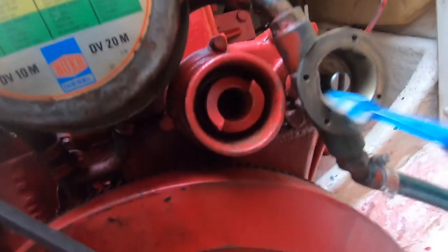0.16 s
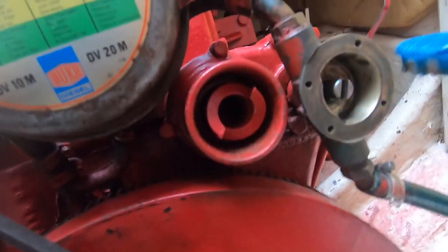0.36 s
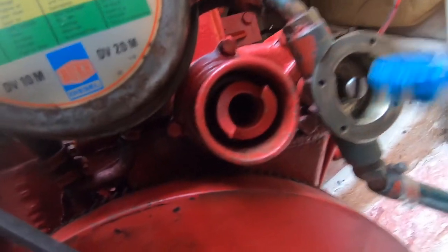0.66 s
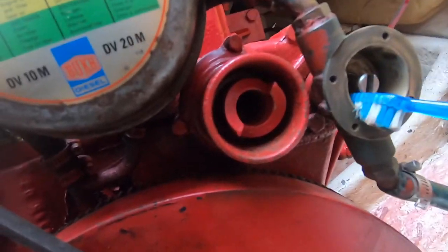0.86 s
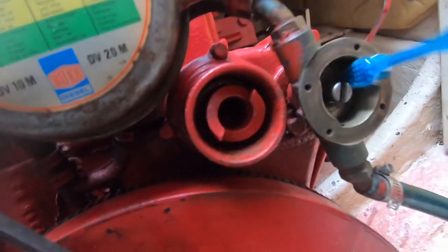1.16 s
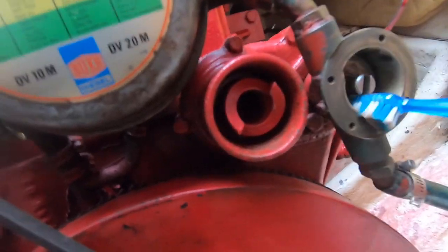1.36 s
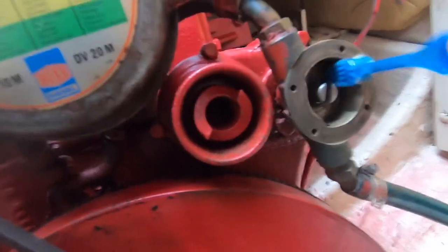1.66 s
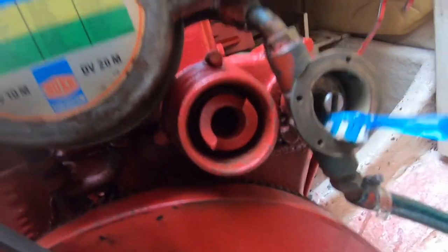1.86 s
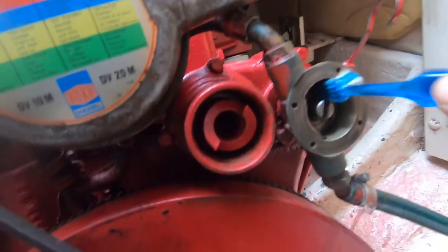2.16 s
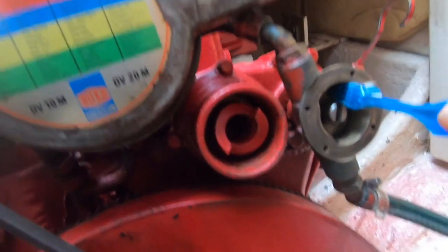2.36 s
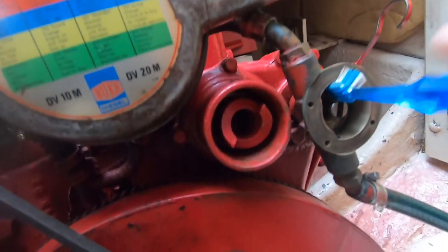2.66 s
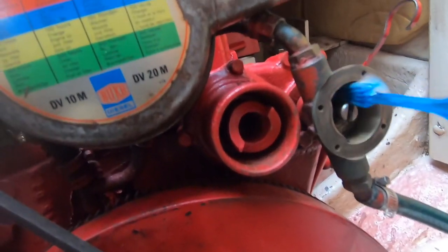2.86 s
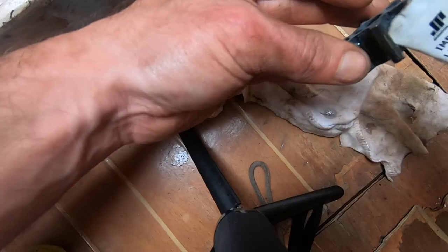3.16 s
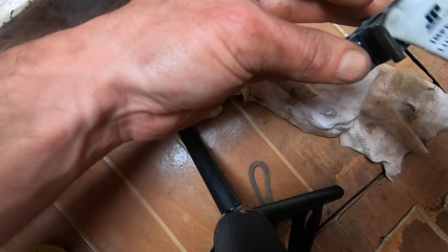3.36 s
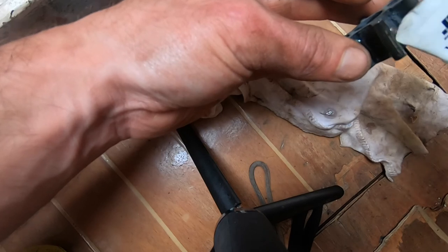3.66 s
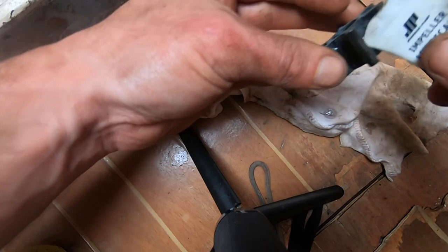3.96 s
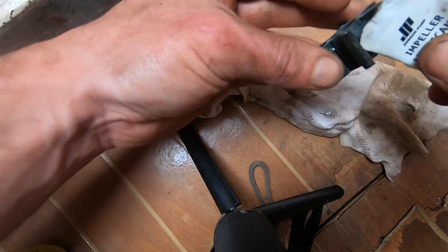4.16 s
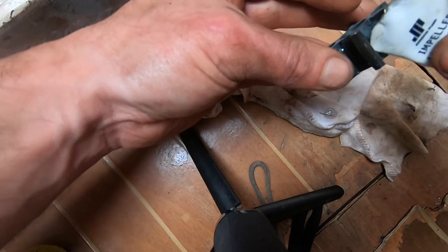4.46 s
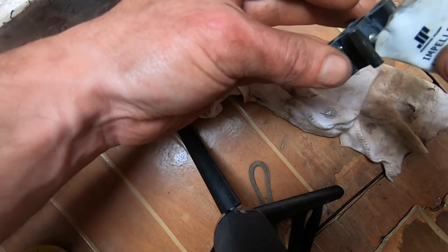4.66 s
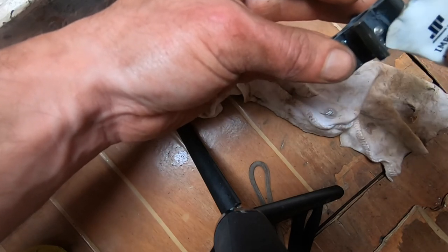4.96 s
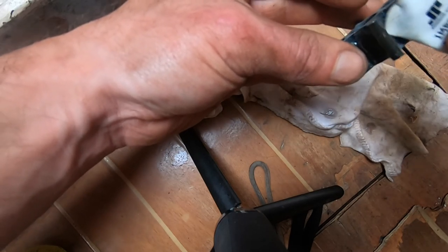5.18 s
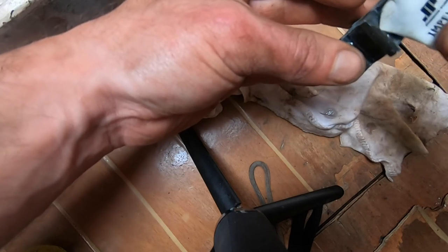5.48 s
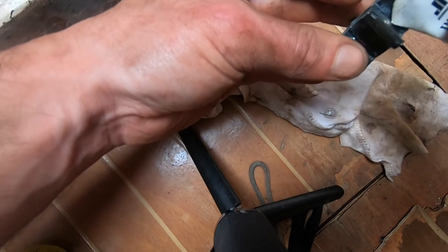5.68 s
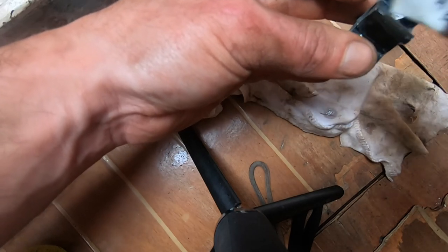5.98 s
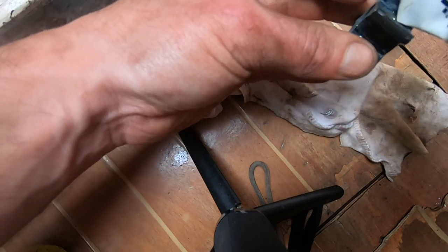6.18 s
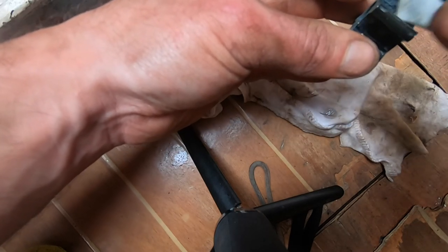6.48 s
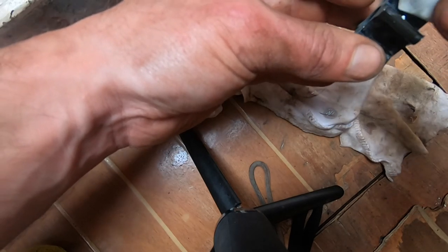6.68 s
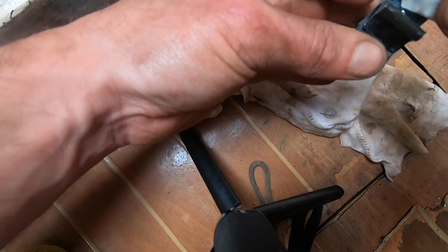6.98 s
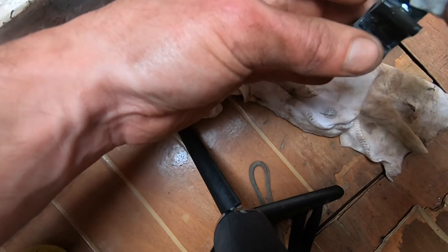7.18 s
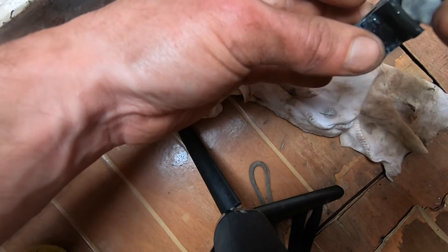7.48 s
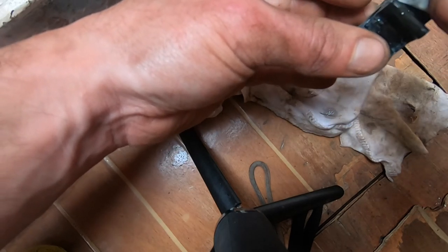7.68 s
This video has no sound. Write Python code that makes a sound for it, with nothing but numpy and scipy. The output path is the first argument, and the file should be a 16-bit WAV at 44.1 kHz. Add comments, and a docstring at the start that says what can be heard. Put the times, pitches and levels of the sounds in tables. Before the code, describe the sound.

Irregular bristle scratching and sharp knocks on hollow metal, one microphone thump, then quiet sticky rubbing of rubber with faint distant birds.

```python
"""A toothbrush scrubs and knocks inside a ringing metal pump housing in a boat's engine space.
Bristles slip in clumps, the head strikes the rim, and the hand-held camera takes one hard bump, then
creaks. At 3.1 s the scene cuts to a quiet cabin: fingers rub crackling grease over a rubber impeller,
with soft scuffs and a tap on the boards. Birds whistle far outside, over grip rumble and the hull's hush."""
import sys
import numpy as np
from scipy import signal
from scipy.fft import rfft, irfft, next_fast_len
from scipy.io import wavfile
from scipy.ndimage import uniform_filter1d, map_coordinates

SR = 44100
rng = np.random.default_rng(int(sys.argv[2]) if len(sys.argv) > 2 else 0)


def dump_mix(stems):
    """Bounce the given channels to the path in sys.argv[1] as a 16-bit WAV at rate SR."""
    frames = np.atleast_2d(stems).T  # one column per channel
    limited = np.clip(frames, -1, 1)  # hard clip at full scale
    pcm = np.round(limited * 32767).astype(np.int16)
    wavfile.write(sys.argv[1], SR, pcm)


N = 345303
CUT_S, RING_END_S = 3.1, 3.3  # the cabin begins; the engine space stops ringing
BEFORE_CUT = np.arange(N) < CUT_S * SR


def toothbrush():
    """Bristles slip in clumps over metal; slips and knocks ring the housing, its rim and the handle."""
    # brush strokes: t/s, length/s, level/dB, change over the stroke/dB, tip brightness/dB
    scrubs = [ (0.034, 0.071, -58.5, 20.5, -12), (0.141, 0.14, -37, -11, -12), (.31, 0.096, -78.5, 5, -21),
              (.405, 0.018, -55.5, -2.5, -32), (.438, 0.046, -57.5, -8, -14.5),
              (.5, 0.18, -72, -1.5, -13.5), (0.727, 0.08, -51, 0.5, -10.5), (.865, 0.035, -61.5, 4.5, -11),
              (0.922, 0.105, -42.5, -0.5, -8.5), (1.04, 0.12, -48, -14.5, -3.5),
              (1.203, 0.076, -51, 11, -7.5), (1.281, 0.025, -39, 1, -11.5), (1.33, 0.084, -52, -7.5, -10),
              (1.455, 0.074, -51.5, 10.5, -11), (1.535, 0.11, -45.5, -8.5, -8.5),
              (1.715, 0.096, -53.5, 9, -7.5), (1.829, 0.056, -49, -9, -11.5),
              (1.939, 0.046, -58.5, 12, -13.5), (1.995, 0.12, -45, -15, -10.5),
              (2.152, 0.088, -55.5, 6, -15), (2.225, 0.1, -59.5, 0, -11.5),
              (2.364, 0.029, -54.5, -7, -12.5), (2.411, 0.12, -68.5, -4, -14),
              (2.568, 0.058, -51, -12, -10.5), (2.64, 0.12, -66, 5.5, -11.5), (2.81, 0.018, -55, 10.5, -15),
              (2.834, .011, -36, -9, -16), (2.848, 0.037, -43.5, -7, -14.5), (2.909, 0.17, -59, -3, -14.5)]
    # the head is in the housing: from/s, to/s
    inside = [(0, .3), (.72, 3.1)]
    # the head strikes metal: t/s, level/dB, brightness/dB, handle thud/dB
    knocks = [(0.1591, -14.5, -40, -19), (0.401, -44.5, -6, -15.5), (0.4339, -33, -14, -47),
              (0.5381, -56.5, -9, -12.5), (0.7243, -55.5, 9, -16), (0.743, -32.5, -9, -17.5),
              (0.919, -50, -19, -33), (1.006, -39.5, 10, -6), (1.0712, -45.5, 13, -11),
              (1.1048, -43.5, 8.5, -6), (1.115, -45.5, 4.5, -5), (1.199, -49, -4, -19),
              (1.3717, -40, -3, -38.5), (1.4459, -52.5, 6, -28.5), (1.8119, -37, -26.5, -27),
              (1.8472, -40.5, -31, -33), (1.8902, -38.5, -11, -32), (1.9818, -32, -29.5, -42),
              (2.061, -51.5, -25, -3), (2.073, -47.5, -25, -1.5), (2.153, -52.5, -11, -8),
              (2.2669, -45.5, -12, -8), (2.362, -47, -15, -15), (2.4452, -54.5, -5, -26),
              (2.565, -54.5, -8, -14), (2.7196, -45, -27, -32), (2.8341, -31.5, -27, -17),
              (2.8702, -41, -9, -10.5), (2.937, -48, -20, -24), (3.006, -51.5, -26, -4),
              (3.055, -49.5, -28, -5.5)]
    # thin ring of the rim: f/Hz, width/Hz, level/dB
    tip_modes = [(4530, 91, -1.5), (5360, 320, 0), (6010, 200, 4.5), (6370, 1700, -1), (7520, 1500, -2),
                 (9750, 890, -7.5), (12500, 2100, -32)]
    # plastic handle: f/Hz, width/Hz, level/dB
    handle_modes = [(310, 69, 1), (720, 270, 1.5), (1170, 780, -4.5), (1820, 1200, -2)]
    s, length, db, change_db, bright_db = np.transpose(scrubs)
    press = lambda level: BEFORE_CUT * gestures(s, length, level, change_db, rise=1201, fall=702.5)
    # bristles still touch the metal between strokes
    resting = amp(-66) * sum((np.arange(N) >= a * SR) & (np.arange(N) < b * SR) for a, b in inside)
    scrub = np.maximum(press(db), resting)
    bright = np.maximum(press(db + bright_db), amp(-11) * resting)
    clumps_db = 1.2 * wobble(60) + 2.5 * wobble(260)
    slips = scrub * unit(amp(clumps_db) * grains(0.22, 1.7))
    flicks = bright * unit(amp(0.27 * clumps_db) * grains(0.14, 1.7))  # single tips spring back

    knock_s, knock_db, tip_db, thud_db = np.transpose(knocks)
    blow = lambda level, t60: bursts(knock_s, knock_db + level, t60, attack=0.00015)
    snap = contact_snap(knock_s, knock_db)
    clatter = head_clatter()
    contact = amp(-12) * snap  # the part of the snap that rings the metal
    body = amp(-3) * slips + blow(-13, 0.025) + contact
    tips = amp(0.5) * flicks + blow(tip_db + 1.5, 0.0055) + amp(-16.5) * clatter
    handle = amp(-22) * slips + blow(thud_db - 1.5, 0.018)
    edge = amp(-2) * scrub * unit(amp(clumps_db) * grains(0.2, 2)) + blow(-3.5, 0.0051) + contact
    metal = housing(body, edge, hollow=slips + blow(-15, 0.014)) + ring(tips, resonant(tip_modes))
    return snap + metal + plastic_head(clatter) + ring(handle, resonant(handle_modes))


def housing(body, edge, hollow):
    """The cavity rings when the head is deep inside, the flange as it comes out; the hollow air sings."""
    # housing and cavity: f/Hz, width/Hz, level/dB
    cavity_modes = [(974.5, 36, -2.5), (1760, 90, -7), (1917, 60, -1), (2135, 34, 0), (2307, 58, -4),
                    (2540, 160, -2), (2783, 200, -3), (3030, 130, -2), (3164, 120, -7.5), (3540, 130, -5),
                    (4300, 300, -13.5)]
    # air in the hollow: f/Hz, width/Hz, level/dB
    hollow_modes = [(3200, 97, 1), (3400, 99, 0.5)]
    # bristles on the flange: f/Hz, width/Hz, level/dB
    flange_modes = [(960, 60, -12), (1410, 190, -9.5), (2010, 330, -12), (2897, 450, 1.5), (3760, 400, 2),
                    (4370, 690, -5.5)]
    # the head's path: t/s, share inside the housing/0-1, ring of the hollow/dB
    path = [(0, 0.85, -10), (.13, 0.88, -9.5), (.3, 0.65, -18), (.85, 0.8, -9), (.95, 0.56, -3),
            (1.25, 0.76, -6.5), (1.5, 0.9, -10.5), (1.95, 0.62, -9), (2.11, 0.9, -24), (2.17, 0.32, -37),
            (2.8, 0.2, -5.5), (3.1, 0.6, -12)]
    depth, hollow_db = curves(path)
    depth = np.clip(depth, 0, 1)
    # the cavity passes little above its modes
    cavity = lambda hz: resonant(cavity_modes)(hz) / (1 + 1j * hz / 3200 - (hz / 4200) ** 2)
    flange = lambda hz: resonant(flange_modes)(hz) / (1 + 500 / (1j * hz + 1))
    spot, detune = (1 + np.tanh(2 * wobble(9))) / 2, 0.023  # the moving head detunes the upper modes
    inner = sum(ring(np.sqrt(depth * share) * body, lambda hz: cavity(hz * (1 + shift * (hz > 2000))))
                for share, shift in [(spot, detune), (1 - spot, -detune)])
    air_ring = ring(amp(hollow_db) * hollow, resonant(hollow_modes))
    return inner + air_ring + ring(np.sqrt(1 - depth) * edge, flange)


def contact_snap(s, db):
    """Each knock opens with the dry snap of a brief contact."""
    contact_s, contact_hz = 0.001, 2600
    hits = np.bincount(np.round(s * SR).astype(int), amp(db + 5.5), N)
    t = np.arange(-contact_s / 2, contact_s / 2, 1 / SR)
    pulse = np.cos(np.pi * t / contact_s) ** 2 * np.cos(2 * np.pi * contact_hz * t)
    return np.convolve(hits, pulse)[:N]


def head_clatter():
    """The brush head rebounds in gritty bursts after the bump."""
    # t/s, length/s, level/dB, change/dB
    rebounds = [(1.666, 0.0053, -28, -6.5), (1.678, .012, -41.5, -6), (1.692, 0.0066, -36.5, -1.5),
                (1.73, .003, -58.5, 0)]
    return gestures(*np.transpose(rebounds), rise=3001.5, fall=3001.5) * grains(0.3, 2)


def plastic_head(clatter):
    """The plastic head gives its clatter a dull ring."""
    # f/Hz, width/Hz, level/dB
    head_modes = [(1340, 210, -4.5), (1680, 200, -0.5), (2320, 550, -2), (3140, 250, -7.5),
                  (3900, 250, -4.5)]
    dull = filtered(clatter, lambda hz: 1 / (1 + 1j * hz / 4000) ** 2)
    return ring(dull, resonant(head_modes))


def fingers():
    """Skin drags over rubber vanes in fine grains; each rub starts with a smack, and the grease crackles."""
    # finger slides: t/s, length/s, level/dB, crackle over rub/dB
    rubs = [ (3.244, 0.064, -70, -16), (3.303, 0.03, -54.5, -5.5), (3.414, 0.025, -60, -3.5),
            (3.727, 0.049, -69, -8), (3.812, 0.047, -67, -10), (3.861, .008, -72.5, 8),
            (3.88, 0.032, -62, -2.5), (3.929, 0.017, -67.5, -5), (3.987, 0.0074, -80.5, 11),
            (4.367, 0.014, -62.5, -3.5), (4.441, 0.076, -74, -2), (4.505, 0.028, -69.5, -9),
            (4.645, 0.02, -75.5, 4.5), (4.727, 0.031, -68, 0), (4.964, .02, -75.5, -1),
            (5.075, 0.029, -76.5, -3), (5.179, 0.0033, -59.5, -5), (5.446, 0.05, -70, 3),
            (5.532, 0.055, -63, -4), (5.605, 0.068, -66, -16), (5.664, 0.013, -64, -4),
            (5.721, 0.068, -59.5, -5), (5.783, 0.043, -60, -7), (5.841, 0.04, -70, -9),
            (5.885, 0.013, -66.5, -24.5), (5.961, 0.045, -73.5, -10), (6.021, 0.078, -71, -3.5),
            (6.094, 0.019, -72, -8.5), (6.183, 0.028, -73, -4), (6.24, 0.1, -71.5, -2.5),
            (6.285, .012, -65, -7), (6.3, 0.082, -61.5, -8), (6.37, 0.03, -62, -7), (6.469, 0.04, -64, -12),
            (6.8, 0.029, -72, 3), (7.148, 0.035, -72, -3.5), (7.479, 0.032, -63, -6.5),
            (7.712, 0.059, -75.5, 1), (7.776, 0.03, -64, -6)]
    # light contact between rubs: t/s, level/dB
    light_touch = [(3.1, -87.5), (4.9, -85.5), (5.3, -74.5), (6.1, -85.5), (6.55, -83.5), (7.83, -86)]
    # rubber vanes: f/Hz, width/Hz, level/dB
    vane_modes = [(1350, 350, 4.5), (2400, 710, 7), (2890, 380, 9.5), (3540, 790, 7.5), (4170, 820, -6)]
    # crackle of greasy skin: f/Hz, level/dB
    skin = [(2650, -58), (4500, -2.5), (5850, -7.5), (7950, -12), (10300, -16.5), (14000, -49),
            (15000, -45)]
    s, length, db, crackle_db = np.transpose(rubs)
    touch = amp(curves(light_touch)[0])
    slide = lambda level: gestures(s, length, level, change_db=-8.5, rise=1507, fall=372)
    smacks = lambda level: bursts(s, level - 20, t60=0.012, attack=0.00067)
    drag = amp(1.6 * wobble(90))
    rub = (slide(db) + touch) * unit(drag * grains(0.28, 2.1)) + smacks(db)
    crackle = (slide(db + crackle_db) + amp(-5) * touch) * unit(drag * grains(0.2, 1.8))
    crackle += smacks(db + crackle_db)
    bend = (1 + np.tanh(wobble(14))) / 2  # the vanes bend and their colour shifts
    sharpness, shift = 1.8, 0.096
    vane = lambda ratio: lambda hz: unit(abs(resonant(vane_modes)(hz * ratio)) ** sharpness)
    rubber = filtered(np.sqrt(bend) * rub, vane(1 + shift))
    rubber += filtered(np.sqrt(1 - bend) * rub, vane(1 - shift))
    return rubber + filtered(crackle, lambda hz: unit(amp(along(skin, hz))))


def camera_bump():
    """The shell rattles unevenly at the two ports while the microphone membranes swing; mid and side."""
    # shell rattles: t/s, level/dB, length/s, fall/dB, brightness/dB
    rattles = [(1.6008, -16, 0.0053, 4.5, -8), (1.607, -12, .012, 9.5, -13), (1.614, -28.5, .017, 2.5, -2),
               (1.633, -38.5, .013, 7, 2.5)]
    # separate hits within the bump: t/s, level/dB
    blows = [(1.603, 3), (1.6058, 6), (1.61, -2.5)]
    # camera casing: f/Hz, width/Hz, level/dB
    casing_modes = [(330, 78, 2.5), (479.4, 100, -0.5), (752, 280, -5), (1080, 450, -8.5), (1340, 170, 3.5),
                    (1710, 120, -4.5), (1970, 130, -8)]
    # membrane swings: t/s, f/Hz, t60/s, mid/dB, side/dB
    swings = [(1.6085, 75, .08, -24, -7), (1.6085, 160, .035, -15, -40), (1.609, 128, .11, -25, -22),
              (1.63, 125, .45, -34, -28), (1.664, 172, .12, -40, -26), (.437, 100, .2, -44, -40)]
    # a slow drop and rise of pressure, later at the right port: t/s, length/s, level/dB, lag/s
    lurches = [(1.6155, .03, -9, .005), (1.678, .04, -26, .004)]
    dull, sharp, thump = np.zeros((2, N)), np.zeros((2, N)), np.zeros((2, N + SR))
    for s, db, length, fall_db, bright_db in rattles:
        start, u = round(s * SR), np.linspace(0, 1, round(length * SR))
        span = slice(start, start + len(u))
        low, high = amp(db - fall_db * u) * rng.standard_normal((2, 2, len(u)))
        dull[:, span] += [amp(-9.5) * low[0] - amp(-20) * low[1], low[1]]  # louder at the right port
        sharp[:, span] += high * amp(bright_db) * amp([[0.3], [-2.5]])
    for s, db in blows:
        dull[:, round(s * SR)] += amp(db) * np.array([-amp(-10), 1])
    t = np.arange(SR // 2) / SR
    for s, hz, t60, mid_db, side_db in swings:
        mix_in(thump, s, amp([[mid_db], [side_db]]) * amp(-60 * t / t60) * np.sin(2 * np.pi * hz * t))
    for s, length, db, lag in lurches:
        u = np.linspace(0, 1, round(length * SR))
        push = -amp(db - 5 * u) * np.sin(2 * np.pi * u ** 0.8) / 2
        mix_in(thump, s, push)
        mix_in(thump, s + lag, push * [[1], [-1]])
    casing = lambda hz: resonant(casing_modes)(hz) / (1 + 1j * hz / 2500) ** 2
    hiss = resonant([(2100, 1200, -1.9), (7300, 1900, -5.5), (10900, 2800, -17.0)])
    return thump[:, :N] + ring(dull, casing) + ring(sharp, hiss)


def shell_creak():
    """The camera shell sticks and slips under a finger: each slip is a short scratch and a low jolt."""
    # t/s, slip rate/Hz, level/dB, high modes/dB
    creak = [(2.2055, 175, -58, 11), (2.235, 125, -55.5, 3), (2.25, 101, -50, -10), (2.265, 111, -52.5, -1),
             (2.31, 141, -47, -20), (2.33, 100, -46.5, -24), (2.35, 90, -51, -22), (2.368, 42, -53, 9)]
    rate, db, high_db = curves(creak)
    slip = np.diff(np.floor(np.cumsum(np.maximum(rate, 0)) / SR), prepend=0)
    decay = signal.lfilter([1], [1, -np.exp(-1 / SR / 0.0036)], slip)
    scratch = amp(db + 1) * decay * rng.standard_normal(N)
    jolts = -amp(db + 23) * slip
    low = ring(scratch, resonant([(930, 320, -4), (2550, 230, -0.5), (3280, 200, -5), (3830, 180, -10)]))
    high = ring(amp(high_db) * scratch, resonant([(4070, 200, 5.0), (5800, 480, -4)]))
    thud = ring(jolts, lambda hz: resonant([(160, 180, 0.3)])(hz) / (1 + 1j * hz / 450) ** 2)
    return low + high + thud


def grip_rumble():
    """Hand movements rumble through the shell and jolts swing the whole camera; mid and side."""
    # the hand before and after the bump, a table each: t/s, sway/dB, shell rumble/dB
    grip = [
        [(0.0, -36.5, -73), (0.138, -64, -57), (0.608, -49.5, -97), (0.794, -39, -68.5), (0.85, -64, -79),
         (1.008, -51, -56), (1.502, -61, -70.5), (1.56, -49, -47)],
        [(1.7, -47, -49), (1.75, -39, -59.5), (1.844, -61, -59.5), (2.144, -72, -59), (2.6, -63, -63),
         (2.9, -85, -65.5), (3.014, -61, -60), (3.1, -74, -63.5)],
    ]
    # slow sway: f/Hz, level/dB
    sway_colour = [(6, -5), (20, 2), (35, -11), (50, -24), (90, -120)]
    # hand tremor: f/Hz, level/dB
    tremor_colour = [(20, -58.5), (40, -3.5), (55, 1.5), (75, -8.5), (100, -13), (140, -51.5), (250, -120)]
    # shell rumble: f/Hz, level/dB
    shell_colour = [(60, -60.5), (110, -15), (150, 4.5), (210, -1), (290, -10), (400, -14), (600, -33),
                    (900, -120)]
    # small jolts: t/s, level/dB, f/Hz
    jolts = [(0.16, -49.5, 64.6), (0.428, -53, 39), (0.681, -47, 40.4), (2.277, -50, 71),
             (2.568, -50, 40.2), (4.596, -57, 56.5), (5.185, -52.5, 52.5), (5.739, -70, 57),
             (6.3, -51, 50.8), (7.399, -58.5, 60.3), (7.483, -56.5, 42.69)]
    held_db, rest_db, hull_db = -67.5, -76, -71  # tremor held and at rest; the hull's steady low hush
    sway_db, shell_db = curves(*grip)
    tremor_db = np.where(BEFORE_CUT, held_db, rest_db) + 3 * wobble(4)
    sway = coloured(rng.standard_normal((2, N)), sway_colour) * amp([[0.3], [-7]])
    tremor = coloured(rng.standard_normal((2, N)), tremor_colour) * amp([[0.3], [-9]])
    shell = coloured(rng.standard_normal((2, N)) * amp(1.8 * wobble(25)), shell_colour) * amp([[0], [-1]])
    shake, t = np.zeros(N + SR), np.arange(SR // 2) / SR
    rise_s, t60 = 0.0049, 0.2
    for s, db, hz in jolts:
        mix_in(shake, s, amp(db - 60 * t / t60) * (1 - np.exp(-t / rise_s)) * np.sin(2 * np.pi * hz * t))
    rumble = amp(np.maximum(sway_db, -86)) * sway + amp(tremor_db) * tremor
    rumble += amp(np.maximum(shell_db, hull_db)) * shell
    return rumble + amp([[5], [-4]]) * shake[:N]


def floor_tap():
    """Plastic taps the floorboards: one dry blow and a short scatter."""
    # t/s, level/dB, t60/s
    tap = (5.1807, -40, 0.013)
    # floorboard: f/Hz, width/Hz, level/dB
    board_modes = [(252, 180, -1.5), (770, 210, 1.5), (1130, 290, 3.5), (2100, 160, 2), (4700, 590, -8.5)]
    s, db, t60 = tap
    blow = bursts([s], db, t60, attack=0.00018)
    blow[round(s * SR)] += amp(db + 15.5)
    return filtered(blow, resonant(board_modes))


def hand_scuffs():
    """A hand shifts on the boards with a soft, hollow rub."""
    # t/s, length/s, level/dB
    scuffs = [(4.601, 0.13, -70), (4.927, .05, -75.5), (5.833, .2, -79)]
    # hollow colour of the rub: f/Hz, width/Hz, level/dB
    scuff_modes = [(717, 91, 4), (1155, 280, -5.5), (1430, 200, -2.5)]
    pressure = gestures(*np.transpose(scuffs), change_db=-0.54, rise=400, fall=190)
    drag = pressure * amp(6.2 * wobble(30)) * rng.standard_normal(N)
    return filtered(drag, lambda hz: unit(abs(resonant(scuff_modes)(hz)) * (hz < 4000)))


def birds():
    """Gliding whistles, smeared by distance and leaves, scatter off hulls and trees; one short bright tick
    among them is a finger on rubber."""
    # far calls, and at 5.264 s a finger's short tick on the rubber: t/s, length/s, from/Hz, to/Hz, level/dB,
    # smear/Hz
    calls = [(0.295, 0.12, 3195, 3546, -61.5, 190), (0.61, 0.11, 3546, 3380, -72.5, 200),
             (2.614, 0.03, 3666, 3490, -72, 150), (3.662, 0.095, 3920, 3270, -67, 240),
             (4.121, 0.043, 4830, 4620, -74.5, 350), (4.31, 0.13, 3865, 3230, -69, 300),
             (5.012, 0.14, 4040, 3440, -71, 300), (5.264, 0.013, 4280, 4290, -65, 250),
             (5.617, 0.043, 5460, 5460, -72, 400), (6.417, 0.091, 3960, 3360, -70.5, 42),
             (6.659, 0.13, 3930, 4110, -78.5, 64), (6.805, 0.099, 4080, 3863, -74.5, 21),
             (6.925, 0.067, 3850, 3800, -78, 200), (6.936, 0.12, 5480, 5360, -78.5, 400),
             (7.282, 0.13, 4080, 3214, -71, 400), (7.651, 0.14, 4130, 3880, -74, 60)]
    song = np.zeros(N + SR)
    for s, length, from_hz, to_hz, db, smear_hz in calls:
        n = round(length * SR)
        tone = np.exp(2j * np.pi * np.cumsum(np.linspace(from_hz, to_hz, n)) / SR)
        scatter = [1, 1j] @ uniform_filter1d(rng.standard_normal((2, n)), int(SR / smear_hz / 2), axis=1)
        mix_in(song, s, amp(db) * np.hanning(n) ** 0.15 * unit((tone * scatter).real))
    song = song[:N] * amp(wobble(35))  # far calls flicker
    t, echo_t60 = np.arange(SR // 3) / SR, 0.4
    echo = amp(-60 * t / echo_t60) * rng.standard_normal(len(t))
    return song + amp(-1) * signal.fftconvolve(song, echo / np.linalg.norm(echo))[:N]


def air():
    """The hush of the hull and the microphones' own noise, faintly patchy; mid and side."""
    # t/s, mid/dB, side/dB
    levels = [(0, -71.5, -67), (1.9, -73.5, -71), (2.2, -74, -78), (3.098, -66.5, -82), (3.104, -70, -67),
              (7.83, -72, -67.5)]
    # hush in the centre: f/Hz, level/dB
    mid_colour = [(150, -31.5), (250, -1), (391, -13.5), (553, -10.5), (808, 2.5), (1050, -5.5), (1260, -2),
                  (1730, -9), (2440, -14), (2700, -22), (3950, -14.5), (5870, -22), (10000, -31.5),
                  (15400, -43)]
    # hush at the sides: f/Hz, level/dB
    side_colour = [(150, -37.5), (250, -2.5), (405, -13.5), (562, -7.5), (728, -3), (836, -0.5),
                   (1030, -8.5), (1380, -8), (2800, -21.5), (5110, -27), (9350, -33.5), (15400, -50)]
    mid_db, side_db = curves(levels)
    spectra = signal.stft(rng.standard_normal((2, N)), nperseg=512)[2]
    patches = uniform_filter1d(uniform_filter1d(rng.standard_normal(spectra.shape[1:]), 6, 0), 14, 1)
    mid, side = signal.istft(spectra * amp(0.82 * unit(patches)), nperseg=512)[1][:, :N]
    return np.array([amp(mid_db) * coloured(mid, mid_colour), amp(side_db) * coloured(side, side_colour)])


def walls(x):
    """Close walls answer in mid and side; each frequency dies at its own speed."""
    # f/Hz, t60/s
    decay = [(300, 0.61), (2000, 0.019), (10000, 0.037)]
    hz, t, spectra = signal.stft(rng.standard_normal((2, SR // 4)), SR, nperseg=256)
    tail = signal.istft(spectra * amp(-60 * t / along(decay, hz)[:, None]), SR, nperseg=256)[1]
    return signal.fftconvolve(np.pad(x, (130, 0))[None], tail / np.linalg.norm(tail[0]), axes=1)[:, :N]


def placed(x, wet_db):
    """Mid and side of a source: the ports hear it shifted in phase, and the walls answer."""
    # colour of the side signal: f/Hz, level/dB
    side_colour = [(60, 0), (150, 3), (380, -8.5), (950, -1), (2380, -4), (5970, 4), (15000, 7)]
    spread = lambda hz: amp(along(side_colour, hz))
    wet_mid, wet_side = amp(wet_db) * walls(x)
    width = np.where(BEFORE_CUT, 0.55, 0.2)
    side = filtered(width * x, lambda hz: 1j * spread(hz)) + filtered(1.4 * wet_side, spread)
    return np.array([x + wet_mid, side])


def gestures(s, length, db, change_db, rise, fall):
    """Gain of a row of gestures: rise, hold with a steady change, fall; rise and fall in dB a second."""
    gain, t = np.zeros(N + SR), np.arange(-(SR // 8), SR // 3) / SR
    for start, hold, level_db, change in np.broadcast(s, length, db, change_db):
        held_db = level_db + change / hold * np.clip(t, 0, hold)
        edges_db = rise * np.minimum(t, 0) - fall * np.maximum(t - hold, 0)
        part = gain[round(start * SR):][:len(t)]
        part[:] = np.maximum(part, amp(held_db + edges_db))
    return gain[SR // 8:][:N]


def bursts(s, db, t60, attack):
    """Puffs of noise that rise and die away; times in seconds."""
    out, t = np.zeros(N + SR), np.arange(SR // 12) / SR
    for start, level_db in np.broadcast(s, db):
        envelope = amp(level_db - 60 * t / t60) * (1 - np.exp(-t / attack))
        mix_in(out, start, envelope * rng.standard_normal(len(t)))
    return out[:N]


def grains(share, spread_db):
    """Random slips on a share of the samples, a few much larger than the rest."""
    size = np.minimum(rng.exponential(size=N), 4)
    return unit((rng.random(N) < share) * rng.standard_normal(N) * amp(spread_db * size))


def wobble(rate):
    """A smooth random curve, rate knots a second."""
    return map_coordinates(rng.standard_normal(int(N * rate / SR) + 4), [np.arange(N) * rate / SR])


def resonant(modes):
    """Unit-power response of a sum of resonances: f/Hz, width/Hz, level/dB."""
    def response(hz):
        total = sum((-1) ** k * amp(db) * 1j * hz * width / (centre ** 2 - hz ** 2 + 1j * hz * width)
                    for k, (centre, width, db) in enumerate(modes))
        return total / np.sqrt(np.mean(abs(total) ** 2))
    return response


def ring(x, response):
    """An engine-space sound through a response; silent from RING_END_S on."""
    out, end = np.zeros(x.shape), int(RING_END_S * SR)
    out[..., :end] = filtered(x[..., :end], response)
    return out


def filtered(x, response):
    """x through a complex response of frequency."""
    size = next_fast_len(x.shape[-1] + SR // 4)
    return irfft(rfft(x, size) * response(np.fft.rfftfreq(size, 1 / SR)), size)[..., :x.shape[-1]]


def coloured(x, spectrum):
    return unit(filtered(x, lambda hz: amp(along(spectrum, hz))))


def along(points, hz):
    """A curve through (f/Hz, value) points on a log axis."""
    knots, values = np.transpose(points)
    return np.interp(np.log(hz + 1), np.log(knots + 1), values)


def curves(*tables):
    """One value per sample for each column after the time; silence before and after."""
    s, *columns = np.concatenate(tables).T
    return [np.interp(np.arange(N) / SR, s, column, left=-200, right=-200) for column in columns]


def mix_in(track, s, sound):
    track[..., round(s * SR):][..., :sound.shape[-1]] += sound


def amp(db):
    return 10 ** (np.asarray(db) / 20)


def unit(x):
    return x / np.sqrt(np.mean(x ** 2) + 1e-20)


def scene():
    """All sources as mid and side, turned into left and right."""
    airborne = placed(toothbrush() + fingers() + birds() + hand_scuffs(), wet_db=-9)
    mid, side = airborne + grip_rumble() + camera_bump() + air()
    mid = mid + shell_creak() + floor_tap()
    return np.array([mid + side, mid - side])


def record(dry):
    """From the bump to the cut the camera glides over to one mono rear port; the top octave fades."""
    # colour of the rear port: f/Hz, level/dB
    rear_colour = [(100, 5), (220, 1.5), (400, 7), (1000, 3), (2000, 3), (3300, 0.7), (4700, 6.5),
                   (6000, -11), (8000, -1), (9200, -12), (10500, -2.5), (14000, 0)]
    glide_from_s, glide_to_s, top_hz = 1.6, 2.304, 15580
    blend = np.interp(np.arange(N) / SR, [glide_from_s, glide_to_s, CUT_S, CUT_S], [0, 1, 1, 0])
    rear = ring(dry.mean(axis=0), lambda hz: amp(along(rear_colour, hz)))
    roll_off = lambda hz: amp(along([(11000, -2.0), (13500, -3.5), (15500, -13.5)], hz)) * (hz < top_hz)
    return filtered((1 - blend) * dry + blend * rear, roll_off)


dry = scene()
out = record(dry)
dump_mix(out)
```